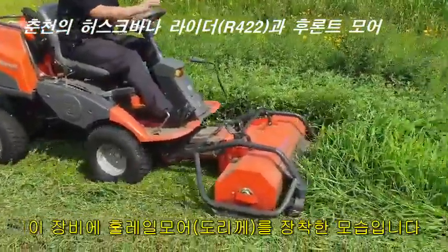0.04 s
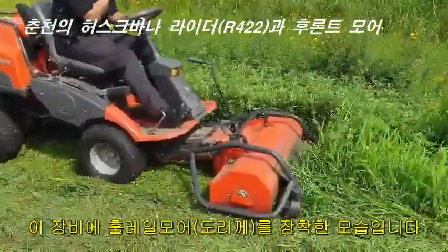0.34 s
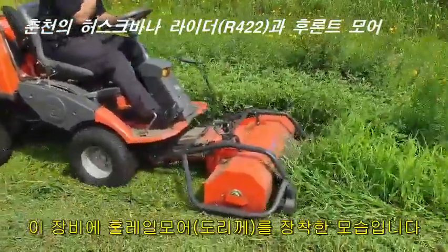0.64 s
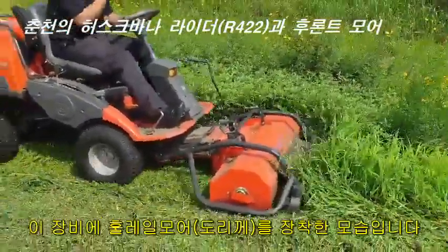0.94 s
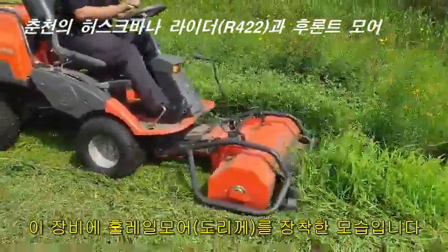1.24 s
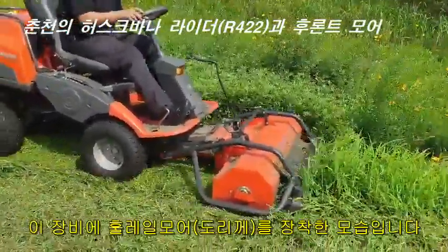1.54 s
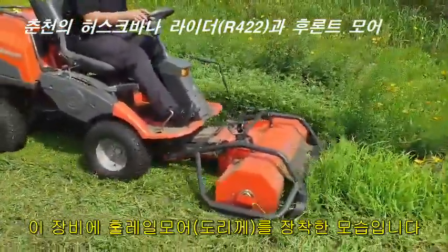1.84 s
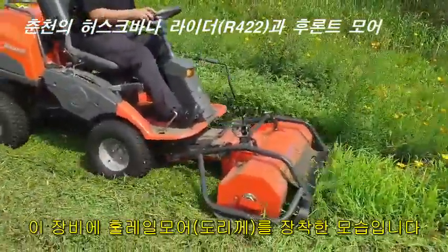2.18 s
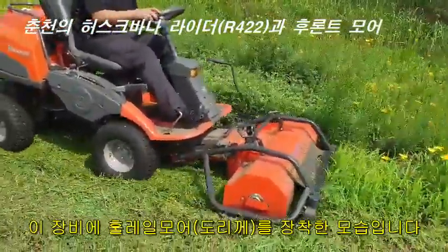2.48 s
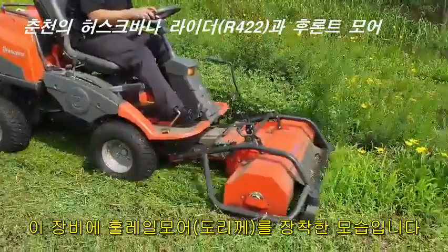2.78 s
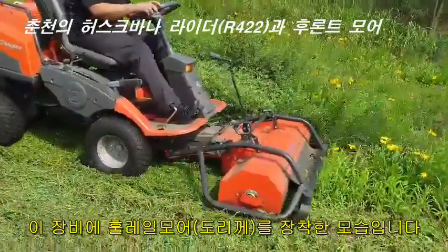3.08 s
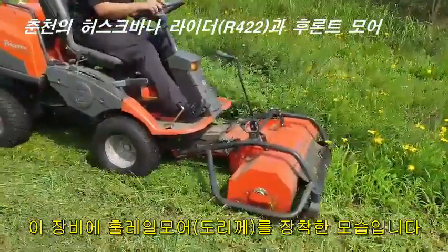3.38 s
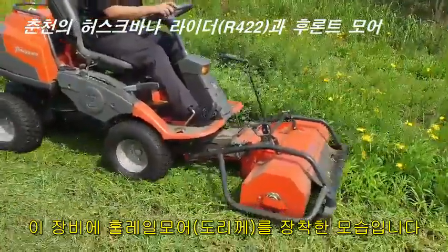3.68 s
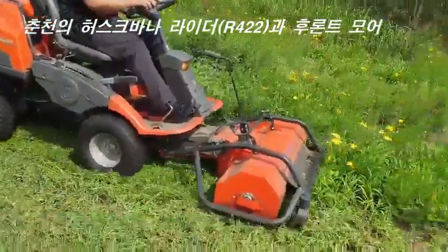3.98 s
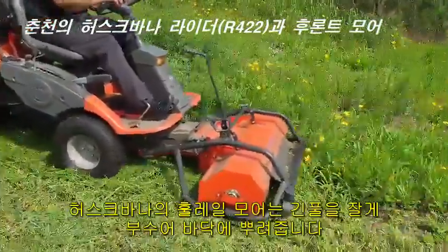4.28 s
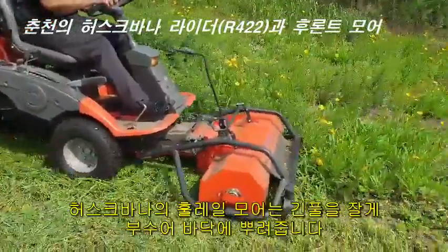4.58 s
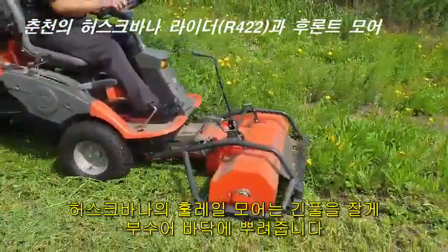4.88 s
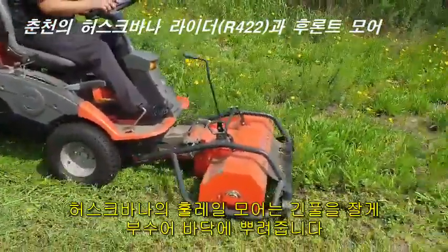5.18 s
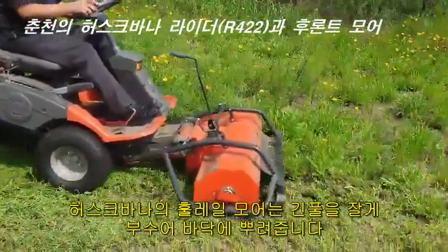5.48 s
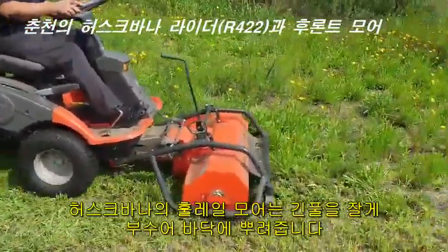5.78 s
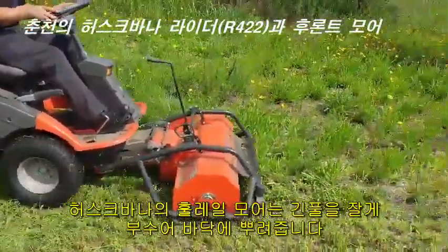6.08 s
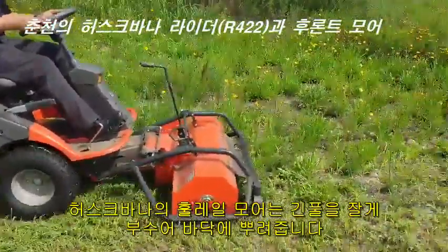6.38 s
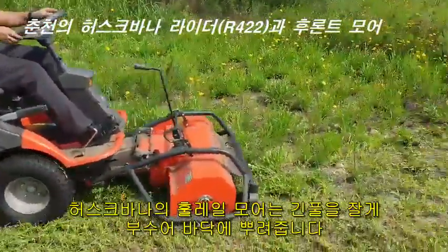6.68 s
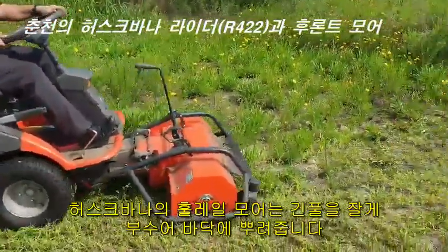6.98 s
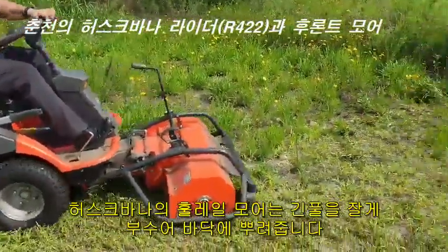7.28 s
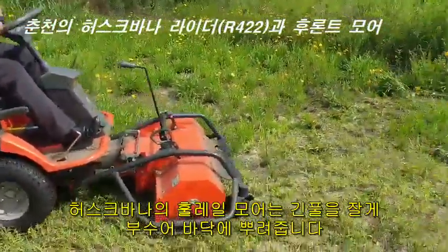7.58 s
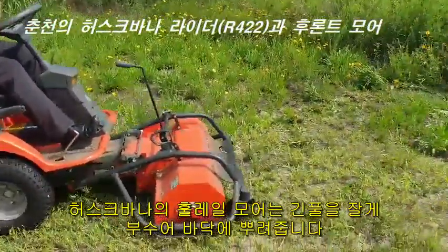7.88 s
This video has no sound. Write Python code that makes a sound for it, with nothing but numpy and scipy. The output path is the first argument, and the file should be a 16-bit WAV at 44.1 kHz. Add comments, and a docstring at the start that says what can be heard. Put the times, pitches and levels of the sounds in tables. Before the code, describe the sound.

A ride-on mower works through tall grass in an open field, a few metres from the microphone and slightly left. Its engine drones steadily while the cutting rotor howls, sagging briefly in thick tufts about a second in. The machine grows louder over the first three seconds, then holds its level. Throughout, stalks tear with a bright hiss and chaff keeps the steel deck rattling and ringing.

```python
"""Open field: a ride-on mower pushes a front flail deck through tall grass, a few metres away.
The belt-driven rotor howls in its steel hood and sags in thick tufts. The twin-cylinder engine
drones and puffs exhaust. Shaft knocks and chaff ring the deck panels; torn stalks and clippings
hiss out. Belts tie rotor, engine and shaft to one speed."""
import sys
import numpy as np
from scipy import signal
from scipy.fft import rfft, irfft
from scipy.io import wavfile

SR = 44100
rng = np.random.default_rng(int(sys.argv[2]) if len(sys.argv) > 2 else 0)


def file_out(sig):
    """Save sig as 16-bit WAV at sys.argv[1]."""
    # one column per channel
    cols = np.atleast_2d(sig).T
    # limit, then scale
    lim = np.clip(cols, -1, 1)
    pcm = np.round(lim * 32767).astype(np.int16)
    wavfile.write(sys.argv[1], SR, pcm)


N = 358974
ENGINE_RATIO, SHAFT_RATIO = 0.5585, 1.1507   # engine cycles, shaft turns per rotor turn


def rotor(turns, roar_db):
    """Flails sweep the hood: tones and pulsed air roar, surging as grass is taken in."""
    # surges and dips: t/s, gain/dB
    surges = [(.5, 1), (.58, -2), (1.11, 1.5), (1.27, -3), (1.58, -1.5), (1.88, -2), (2.25, 1.5),
              (2.47, -2), (2.57, 3), (2.83, -1.5), (2.99, -1), (3.12, 2.5), (3.23, 0.5), (3.3, 0),
              (3.57, 0.5), (3.67, 1.5), (3.8, -2), (3.86, 3.5), (4.04, 1.5), (4.38, -1.5), (6.13, -4),
              (6.93, -2.5), (7.3, 1), (7.83, -4.5)]
    # tone position: t/s, left minus right/dB
    tone_side = [(0, 7.5), (.5, 3.5), (1.3, 1.5), (3, 1), (5.3, 2), (6.5, 4.5), (8.14, 7)]
    # hood air spectrum: f/Hz, level/dB
    hood_spectrum = [(400, -25), (475, -10.5), (515, -2), (548, -1), (578, -3.5), (612, 4.5), (660, 5.5),
                     (745, 5), (840, 0.5), (895, -6), (950, -13.5), (1010, -3.5), (1100, -24),
                     (1700, -22.5)]
    # upper roar, opening up on shorter grass: t/s, level/dB
    upper_level = [(0, -41), (2.5, -33), (3.7, -27.5), (6, -30.5), (8.14, -23.5)]
    (side_db,), (upper_db,) = in_time(tone_side), in_time(upper_level)
    swing = turns + 0.0013 * drift(23)   # hinged flails lag and catch up
    howl = from_db(-2) * hood_howl(swing)
    roar_gain = from_db(roar_db) * waver(depth_db=0.4, rate_hz=8.1)
    tones = (howl + overtones(swing)) * pan(side_db)
    sweeps = 1 + 0.5 * puffs(2 * turns, decay=0.76) + 0.074 * puffs(turns, decay=0.67)
    upper = from_db(upper_db) * band(rng.standard_normal(N) * sweeps, hz=795, width_hz=192)
    roar = roar_gain * colour(white_pair() * sweeps, hood_spectrum)
    surge_db = sum(db * bump(at_s, half_s=0.04) for at_s, db in surges)
    return from_db(surge_db) * (tones + upper + roar)


def hood_howl(turns):
    """Two rotor orders near the cavity resonance; grass in the hood shifts power between them."""
    # howl: t/s, level/dB, hood packing/0-1
    howl_curve = [(0.0, -21.5, 0.7), (0.4, -17.5, 0.84), (0.65, -15, 1), (0.87, -16, 0.9),
                  (1.1, -15.8, 0.9), (1.3, -17, 0.4), (1.55, -19, 0.5), (1.75, -18, 0.6), (2.2, -16.3, .72),
                  (2.55, -15.5, 0.42), (2.8, -20, 0.07), (3.15, -16, 0.25), (3.6, -18, 0.03),
                  (4.05, -18.5, 0.15), (4.5, -21, 0.19), (4.9, -19.5, 0.17), (5.4, -19.5, 0.04),
                  (6.25, -20, 0), (6.55, -21.5, 0.08), (7.4, -22, 0.14), (8.14, -21.5, 0)]
    # resonant orders: multiple of rotor turn, clear level/dB, packed level/dB
    orders = [(14, 0.5, -13), (15, -32, -0.5)]
    howl_db, packed = in_time(howl_curve)
    out = 0
    for order, clear_db, packed_db in orders:
        share = np.sqrt((1 - packed) * from_db(clear_db) ** 2 + packed * from_db(packed_db) ** 2)
        tone = waver(depth_db=0.24, rate_hz=15) * partial(turns, order, rough=0.2, flutter_hz=16)
        # uneven belt pull: sidebands at engine and shaft rate
        tugs = sum(partial(turns, order + step, rough=1.9, flutter_hz=5.6)
                   for step in (-ENGINE_RATIO, SHAFT_RATIO))
        out += from_db(howl_db) * share * (tone + from_db(-24.5 + 1.5 * packed) * tugs)
    return out


def overtones(turns):
    """The hood beams further rotor orders; they sing out in turn as the mower passes."""
    # beams: multiple of rotor turn, off-beam level/dB, on-beam level/dB, start/s, end/s
    beams = [(12, -47, -47, 1, 3), (16, -40.5, -27.5, 2.7, 8.6), (17, -39, -29, 3.88, 5.17),
             (18, -42, -31.5, 3.2, 5.4), (19, -46, -32, 5.46, 8.6), (23, -52, -41, 2, 8.6),
             (30, -50, -39.5, 2.994, 8.6)]
    fade_s = 0.42
    t, out = np.arange(N) / SR, 0
    for order, off_db, on_db, start_s, end_s in beams:
        in_beam = np.clip(0.5 + np.minimum(t - start_s, end_s - t) / fade_s, 0, 1)
        tone = partial(turns + rng.random(), order, rough=0.15, flutter_hz=7.6)
        out += from_db(off_db + (on_db - off_db) * in_beam) * tone
    return out


def tuft_load():
    """Rotor drag and crunch build as a tuft is drawn in and ease as it clears."""
    # thick tufts: t/s, speed lost/(turns/s), crunch/dB
    tufts = [(0.65, 0.8, 1), (1.06, 0.82, -0.5), (2.15, 0.021, 0.5), (3.8, 0.0087, 2.5), (5.35, 0.0037, 2)]
    rise_s, fall_s = 0.2007, 0.2214
    t = np.arange(N) / SR
    times_s, lost_hz, crunch_db = np.transpose(tufts)
    swells = np.array([np.interp(t, [s - rise_s, s, s + fall_s], [0, 1, 0]) for s in times_s])
    return lost_hz @ swells, crunch_db @ swells


def engine(turns, near_db):
    """Uneven V-twin firings: drone with a strong fifth order, exhaust puffs, plus shaft hum."""
    # drone: multiple of four-stroke cycle, start level/dB, end level/dB
    engine_orders = [(2, -8.5, -9.5), (4, -12.5, -9.5), (5, 0.5, 1), (6, -10, -11), (8, -5, -12),
                     (9, -15, -18), (10, -7, -11), (11, -17, -15.5), (16, -24, -15.5)]
    # hum: multiple of shaft turn, start level/dB, end level/dB
    shaft_orders = [(1, -24, -21), (3, -15, -13), (4, -16, -15), (5, -14, -9.5)]
    # exhaust spectrum: f/Hz, level/dB
    exhaust_spectrum = [(15, -8), (35, -7), (65, -4), (90, 0.5), (150, 3), (190, -0.5), (215, -0.5),
                        (255, 2), (290, -3.5), (370, -3), (405, -3), (440, -12.5), (600, -1), (1200, -34)]
    # hollow midrange boom: t/s, level/dB
    boom_level = [(0, -48), (1.25, -42), (1.5, -37.5), (2.3, -36), (3, -37), (4.05, -34.5), (4.5, -40),
                  (6.3, -36.5), (6.6, -32), (7.15, -31.5), (7.5, -35.5), (8.14, -35)]
    cycles, shaft_turns = turns * ENGINE_RATIO, turns * SHAFT_RATIO
    drone = hum = 0
    for order, start_db, end_db in engine_orders:
        delayed = cycles - 0.01218 * order   # silencer delays high orders more
        drone += ramp(start_db, end_db) * partial(delayed, order, rough=0.037 * order, flutter_hz=7.3)
    for order, start_db, end_db in shaft_orders:
        tone = partial(shaft_turns + rng.random(), order, rough=0.38, flutter_hz=5)
        hum += ramp(start_db, end_db) * tone
    firings = puffs(cycles, decay=0.57) + puffs(cycles + 3 / 8, decay=0.19)   # one term per cylinder
    throb = 1 + 0.5 * firings
    exhaust = colour(white_pair() * throb, exhaust_spectrum)
    boom_db, = in_time(boom_level)
    boom = from_db(boom_db) * band(rng.standard_normal(N) * throb, hz=368, width_hz=77)
    drone *= from_db(-27 + near_db) * waver(depth_db=-0.2, rate_hz=2.4)
    return drone + boom + from_db(-27 + 1.1 * near_db) * (hum + exhaust)


def clatter(turns):
    """The shaft knocks once a turn and chaff pelts the casing; both ring the steel."""
    # casing spectrum: f/Hz, level/dB
    casing_spectrum = [(600, -18), (1000, -2.5), (1130, -2), (1650, 0.4), (1900, -1.4), (2250, 0),
                       (2720, 0.5), (2950, -7.5), (3400, -4), (4200, -3), (5500, -3), (9000, -25)]
    # deck panels: f/Hz, width/Hz, start level/dB, end level/dB, left-right correlation
    panels = [(1344, 65, -9, -24.5, 0.65), (2490, 280, -19.5, -8, 1)]
    knocks = puffs(turns * SHAFT_RATIO, decay=0.09) * (1 + 0.28 * np.tanh(drift(25)))
    blows = white_pair() * np.sqrt(1 + (0.14 * knocks) ** 2) + 0.3 * grains(per_s=3000, size_db=-5.5)
    out = colour(rasp(blows, depth_db=1.75, bands=12), casing_spectrum) + deck_ring(knocks)
    for hz, width_hz, start_db, end_db, alike in panels:
        gain = ramp(start_db, end_db) * waver(depth_db=1.3, rate_hz=9.8)
        out += gain * panel(knocks, hz, width_hz, alike)
    return out + lip_ring(knocks)


def panel(knocks, hz, width_hz, alike):
    """A steel panel kept ringing by chaff and knocks."""
    blows = white_pair() * np.sqrt(1 + (0.5 * knocks) ** 2)
    return stereo(blows, resonance(hz, width_hz), alike)


def deck_ring(knocks):
    """Hard chaff rings the deck's narrow modes, more strongly at each knock."""
    # steel modes: f/Hz, width/Hz, level/dB
    deck_modes = [(1235, 73, -2), (1346, 28, 1), (1562, 40, -5.5), (1835, 49, -4), (2120, 62, -3.5),
                  (2285, 59, 0.5), (2373, 33, 2), (2472, 40, 3.5), (2603, 55, 4.5), (2710, 38, -1.5),
                  (2876, 29, -2.5), (3123, 24, -0.5), (4170, 64, -5), (4550, 46, -5)]
    body = sum(from_db(db) * resonance(hz, width_hz) for hz, width_hz, db in deck_modes)
    pelts = grains(per_s=700, size_db=2.5) * np.sqrt(1 + (0.6 * knocks) ** 2)
    return from_db(-7) * stereo(pelts, body, alike=0.48)


def lip_ring(knocks):
    """The hood's lip rings; grass touches and releases it, moving level and pitch."""
    # ring, free or damped: t/s, level/dB
    lip_level = [(0, 1.5), (.33, 3.5), (.65, -4.5), (.92, 2.5), (1.3, -7), (1.62, -2.5), (1.8, -6),
                 (2.6, -5.5), (2.9, -3.5), (3.2, -3), (3.8, -4.5), (4.3, -0.5), (5.25, -1), (5.55, -1),
                 (6, 2.5), (6.28, -5), (6.5, -1), (6.78, -4.5), (7.2, 1.5), (7.55, -1), (7.82, 2),
                 (8.14, 1)]
    # ring pitch: t/s, f/Hz
    lip_pitch = [(0, 3870), (.4, 3870), (.9, 3795), (3.6, 3821), (4.8, 3756), (6.2, 3840), (6.9, 3825),
                 (8.14, 3790)]
    (ring_db,), (lip_hz,) = in_time(lip_level), in_time(lip_pitch)
    ring = panel(knocks, lip_hz.mean(), width_hz=106, alike=0.68)
    shift_hz = lip_hz - lip_hz.mean() + 32 * drift(9.83)
    shifted = np.real(signal.hilbert(ring) * np.exp(2j * np.pi * np.cumsum(shift_hz) / SR))
    return from_db(ring_db - 5) * waver(depth_db=1.4, rate_hz=11) * shifted


def grass(turns, swish_db, spray_db):
    """Stalks tear in clumps as the flail rows come round; fine clippings spray out."""
    # torn grass spectrum: f/Hz, level/dB
    swish_spectrum = [(2500, -29), (3900, -6), (4700, 1), (5400, 1), (6000, 3), (6700, 4.5), (7400, 3.5),
                      (8050, 4), (8600, -1.5), (9600, -28), (13000, -36)]
    # clippings spectrum: f/Hz, level/dB
    spray_spectrum = [(4000, -9.5), (8000, -31), (9050, 6.5), (9600, 4), (10700, 3.5), (11700, 5.5),
                      (12400, 4.5), (12900, -1.5), (13450, 5), (14400, -10.5), (15200, -14), (16000, -9.5)]
    clumps = 1 + 0.03 * puffs(turns, decay=0.3) + 0.11 * puffs(turns * SHAFT_RATIO, decay=0.26)
    tearing = clumps * (white_pair() + 0.5 * grains(per_s=3300, size_db=3))
    swish = from_db(swish_db) * colour(rasp(tearing, depth_db=2.5, bands=24), swish_spectrum)
    flow = clumps * waver(depth_db=1.2, rate_hz=26)
    clippings = flow * (white_pair() + 0.34 * grains(per_s=3000, size_db=1.5))
    spray = from_db(spray_db) * colour(clippings, spray_spectrum)
    return swish + spray + brush() + swathes(clumps)


def swathes(clumps):
    """Each swathe tears at its own pitch; the shrill top of the hiss comes and goes."""
    # shrill hiss: t/s, level/dB
    shrill_level = [(0, -35), (.9, -39), (1.4, -29.5), (1.85, -35), (2.2, -25.5), (2.38, -31), (2.6, -27.5),
                    (3.1, -26.5), (3.6, -27), (3.72, -23), (4, -24), (4.55, -33), (5.1, -28), (6.35, -28.5),
                    (6.53, -23), (6.85, -27), (6.97, -39), (7.75, -41), (8.05, -24)]
    # swathes: t/s, half-length/s, f/Hz, level/dB, left minus right/dB
    cuts = [(0.694, 0.16, 6040, -25.5, 1), (.85, 0.2, 3020, -31.5, 5), (2.25, .07, 5450, -32, 0),
            (3.08, 0.16, 5300, -26, -1), (3.833, .1, 4900, -28, -2), (6.76, .06, 5400, -27, -2),
            (7.247, .07, 5230, -26, -2)]
    tearing = clumps * (white_pair() + 0.42 * grains(per_s=4100, size_db=-8))
    shrill_db, = in_time(shrill_level)
    out = from_db(shrill_db) * band(tearing, hz=7800, width_hz=1120)
    for at_s, half_s, hz, db, side_db in cuts:
        out += from_db(db) * bump(at_s, half_s) * pan(side_db) * band(tearing, hz, width_hz=0.29 * hz)
    return out


def brush():
    """Tall blades brush the left of the deck in the first second."""
    # brushing: t/s, level/dB
    brush_level = [(0, -15), (.35, -16.5), (.55, -20.5), (.74, -25), (.86, -44), (1.1, -96)]
    # brushing spectrum: f/Hz, level/dB
    brush_spectrum = [(1500, -11.5), (2400, -1.5), (3100, -1), (3800, -4), (4700, -1.5), (5500, -4),
                      (6100, 1.5), (7300, 6), (8000, 1), (8700, -8), (10500, -14), (14000, -41)]
    brush_db, = in_time(brush_level)
    rubbing = colour(white_pair() * waver(depth_db=1.1, rate_hz=11), brush_spectrum)
    return from_db(brush_db) * rubbing * from_db([[0], [-20]])


def rasp(pair, depth_db, bands):
    """Each treble band swells by itself as tufts of differing stiffness tear."""
    spectrum, octave = rfft(pair), np.log2(bins_hz() + 1)
    centres = np.linspace(np.log2(2000), np.log2(16000), bands)
    return sum(irfft(spectrum * np.interp(octave, centres, weights), N) * waver(depth_db, rate_hz=21)
               for weights in np.eye(bands))


def partial(turns, order, rough, flutter_hz):
    """One order of a rotation, unsteady in strength and phase."""
    unsteady = 1 + rough * (drift(flutter_hz) + 1j * drift(flutter_hz))
    return np.sqrt(2) * np.real(unsteady * np.exp(2j * np.pi * order * turns))


def puffs(turns, decay):
    """One burst per turn; decay in turns."""
    return rms_one(np.exp(-(turns % 1) / decay))


def grains(per_s, size_db):
    """Random snaps of uneven size, with their own strength on each side."""
    born = rng.random(N) < per_s / SR
    return rms_one(white_pair() * born * from_db(size_db * np.minimum(rng.exponential(1, N), 4)))


def white_pair():
    return rng.standard_normal((2, N))


def colour(pair, spectrum):
    """Shape an excitation: bass alike on both sides, treble diffuse."""
    # stereo likeness: f/Hz, left-right correlation
    likeness = [(60, 1), (130, 0.9), (300, 1), (450, 0.74), (620, 0.7), (870, 1), (1150, -0.045),
                (1500, 0.12), (2000, -0.18), (2500, 0.88), (3000, 0.093), (6000, -0.009), (8000, 0.048),
                (15000, -0.026)]
    return stereo(pair, from_db(per_bin(spectrum)), per_bin(likeness))


def stereo(pair, response, alike):
    """Filter two unrelated excitations and mix them as mid and side, rms 1."""
    # balance: f/Hz, left minus right/dB
    balance = [(380, -0.5), (550, 3.5), (900, -2.5), (1400, 4.5), (1800, 2.5), (2200, 3.5), (3000, -0.5),
               (5200, -2), (7000, -2), (9000, .7), (15000, 0)]
    mid, side = rfft(pair)
    alike = np.clip(alike, -0.99, 0.99)
    both = np.sqrt(1 + alike) * mid + np.sqrt(1 - alike) * side * [[1], [-1]]
    return rms_one(irfft(both * response * pan(per_bin(balance)), N))


def arrive(pair):
    """The mower is slightly to the left; the two sides differ in phase."""
    # phase difference: f/Hz, left lead/rad
    lead = [(60, 0.14), (125, 0.29), (300, -0.41), (560, 0.4), (850, -0.2), (1300, 1.36), (1750, 0.12),
            (2450, 0.45), (2800, 1.9), (3200, -1), (3750, 0.76), (4000, 0.55), (4500, -0.15)]
    return irfft(rfft(pair) * np.exp(-1j * per_bin(lead) * [[0], [1]]), N)


def band(noise, hz, width_hz):
    """Band-pass, rms 1."""
    sos = signal.butter(2, [hz - width_hz / 2, hz + width_hz / 2], "band", fs=SR, output="sos")
    return rms_one(signal.sosfilt(sos, noise))


def resonance(hz, width_hz):
    return 1 / (1 + 1j * (bins_hz() - hz) / width_hz) ** 2


def drift(rate_hz, size=8192):
    """Slow random curve, rms 1."""
    lowpass = 1 / (1 + (np.arange(size // 2 + 1) * SR / N / rate_hz) ** 2)
    slow = irfft(rfft(rng.standard_normal(size)) * lowpass)
    return np.interp(np.linspace(0, size - 1, N), np.arange(size), rms_one(slow))


def waver(depth_db, rate_hz):
    return from_db(depth_db * drift(rate_hz))


def ramp(start_db, end_db):
    return from_db(np.linspace(start_db, end_db, N))


def bump(at_s, half_s):
    """Gaussian swell, height 1."""
    return np.exp(-np.minimum(((np.arange(N) / SR - at_s) / half_s) ** 2, 20))


def pan(side_db):
    return from_db(np.array([[1], [-1]]) * side_db / 2)


def in_time(rows):
    """One per-sample curve for each column after t/s."""
    times_s, *columns = np.transpose(rows)
    return [np.interp(np.arange(N) / SR, times_s, column) for column in columns]


def per_bin(rows):
    """Interpolate onto the FFT bins in log frequency."""
    hz, values = np.transpose(rows)
    return np.interp(np.log(bins_hz() + 1), np.log(hz), values)


def bins_hz():
    return np.arange(N // 2 + 1) * SR / N


def from_db(db):
    return 10 ** (np.asarray(db) / 20)


def rms_one(x):
    return x / np.sqrt(np.mean(x ** 2) + 1e-20)


def scene():
    """One speed drives all parts; nearness and grass intake move the levels."""
    # governed rotor speed: t/s, speed/(turns/s)
    speed = [(0.0, 42.88), (0.45, 42.8), (0.9, 42.9), (1.33, 43.39), (1.7, 42.95), (2.2, 42.68),
             (2.9, 43.1), (3.25, 43.07), (3.5, 43.38), (4.25, 43.82), (5.7, 43.61), (6.3, 43.62),
             (6.6, 43.86), (7.5, 43.9), (8.14, 44.26)]
    # mower drawing abreast: t/s, gain/dB
    nearness = [(0, -5.5), (1.1, -4.5), (2.4, -1.5), (3.3, -0.4), (4.6, -0.5), (6.2, -0.43), (7.3, 0.5),
                (8.14, 0.3)]
    # grass intake: t/s, level/dB
    feed = [(0, -0.1), (.8, -0.5), (2.2, -0.1), (3.1, 0.5), (3.8, 0.5), (4.4, 0), (5.3, 0.95), (6.5, -0.1),
            (7.6, -0.5), (8.14, 0.5)]
    (speed_hz,), (near_db,), (feed_db,) = in_time(speed), in_time(nearness), in_time(feed)
    lost_hz, crunch_db = tuft_load()
    turns = np.cumsum((speed_hz - lost_hz) * (1 + 0.00071 * drift(4.9))) / SR
    feed_db += 0.17 * drift(3.1)   # uneven grass
    hood = rotor(turns, roar_db=-20.5 + 0.81 * near_db + 0.46 * crunch_db)
    casing = from_db(-21 + near_db + crunch_db + 0.39 * feed_db) * clatter(turns)
    cutting = grass(turns, swish_db=-22 + near_db + feed_db, spray_db=-25.5 + near_db + 2.4 * feed_db)
    return arrive(hood + engine(turns, near_db) + casing + cutting)


def record(dry):
    """Clip rare peaks at full scale, then cut the top steeply."""
    cutoff_hz = 15700
    lowpass = 1 / np.sqrt(1 + (bins_hz() / cutoff_hz) ** 300)
    return irfft(rfft(np.clip(dry, -1, 1)) * lowpass, N)


dry = scene()
out = record(dry)
file_out(out)
```